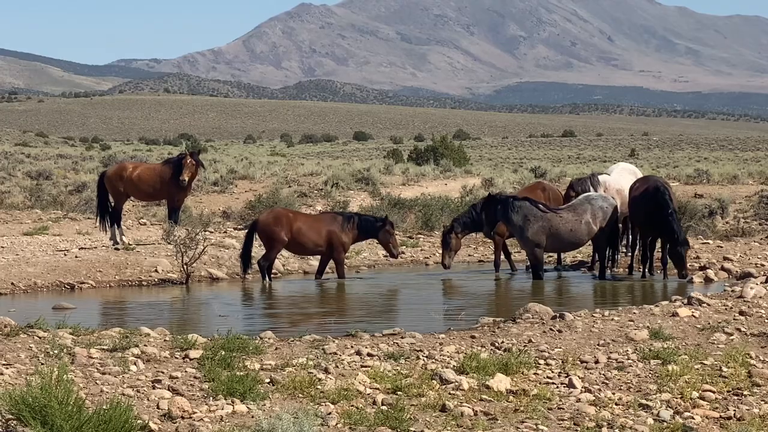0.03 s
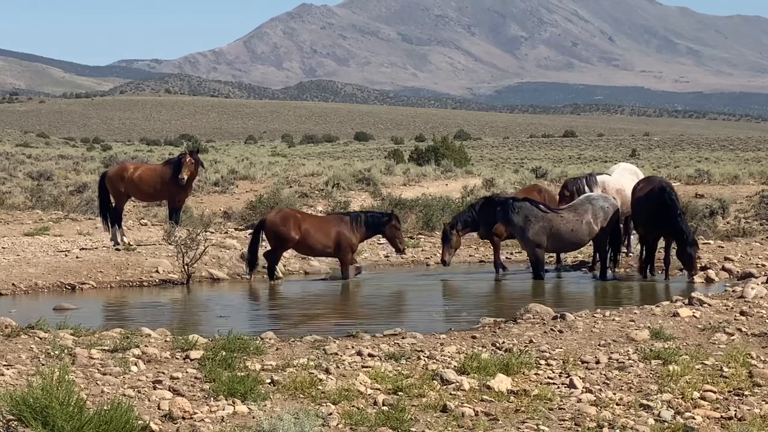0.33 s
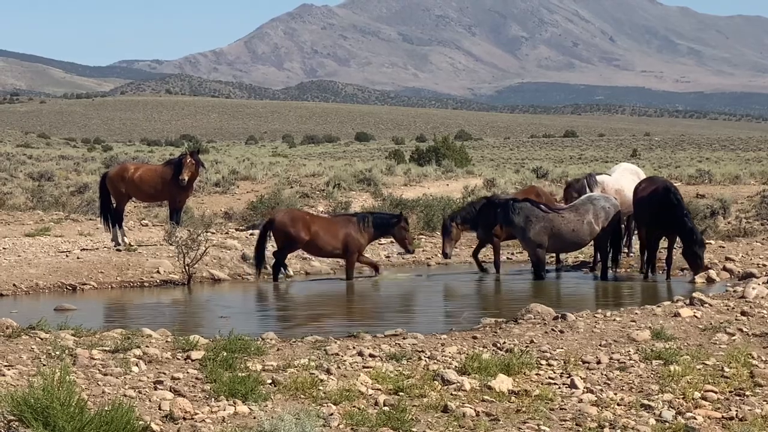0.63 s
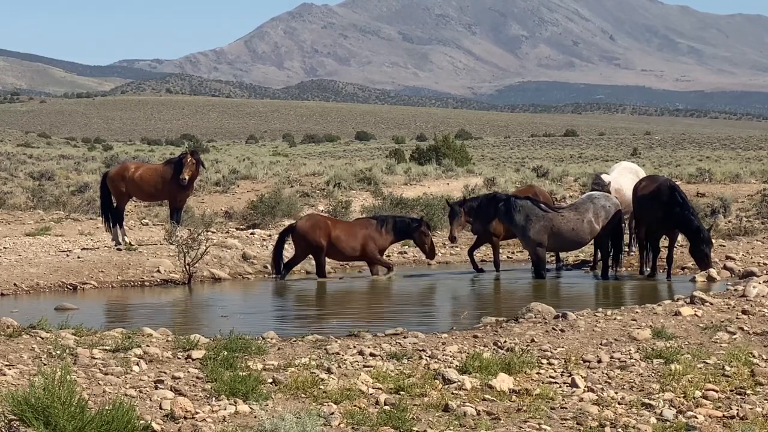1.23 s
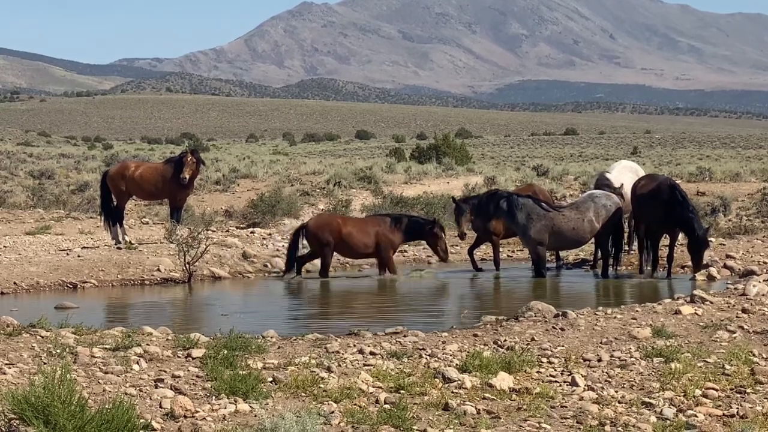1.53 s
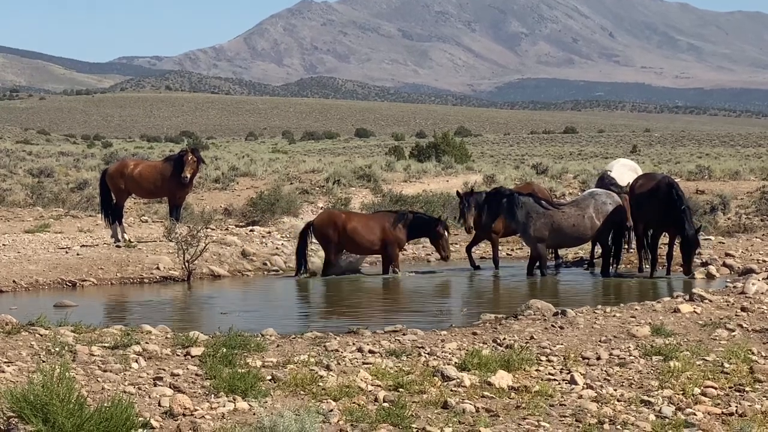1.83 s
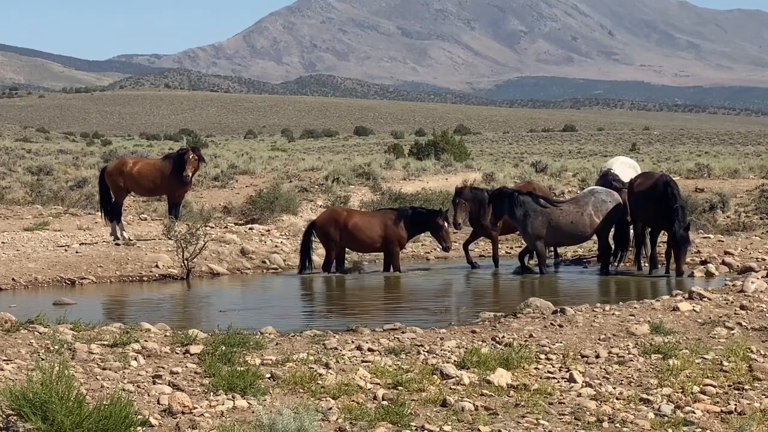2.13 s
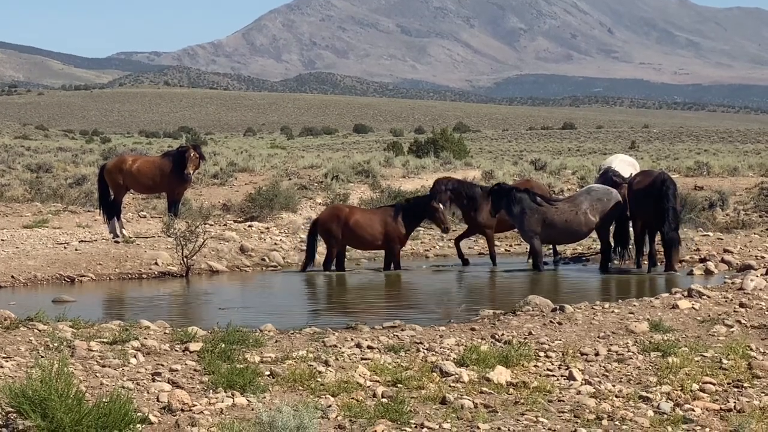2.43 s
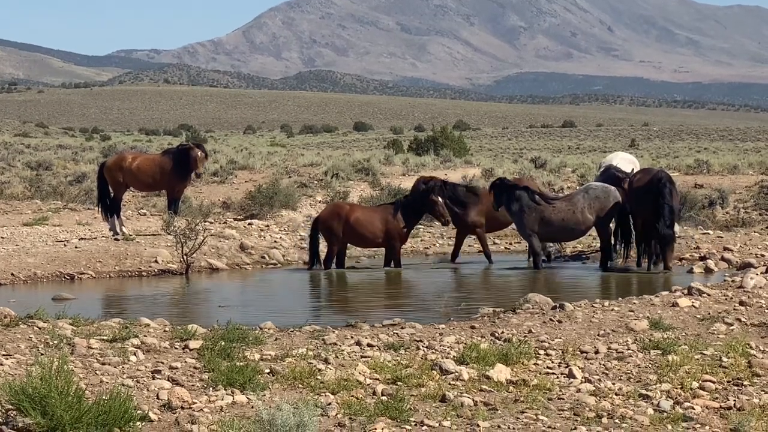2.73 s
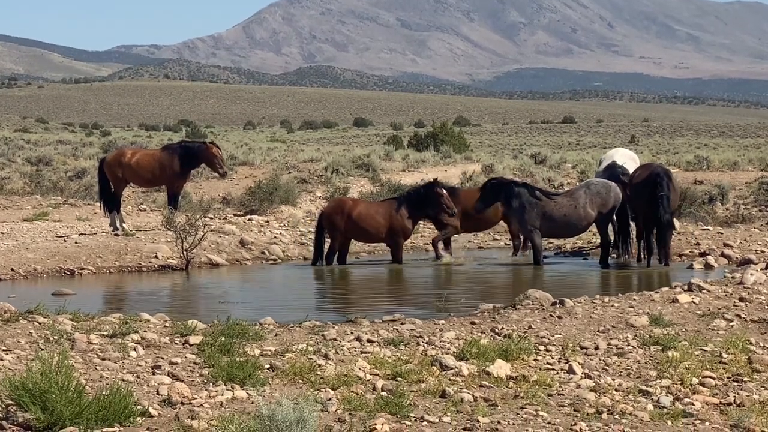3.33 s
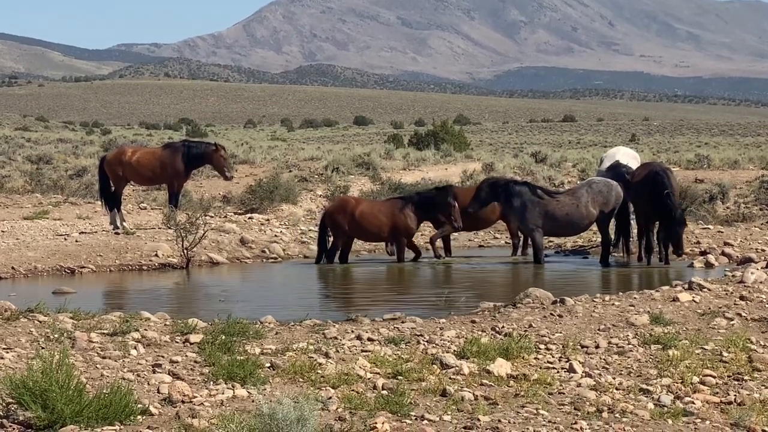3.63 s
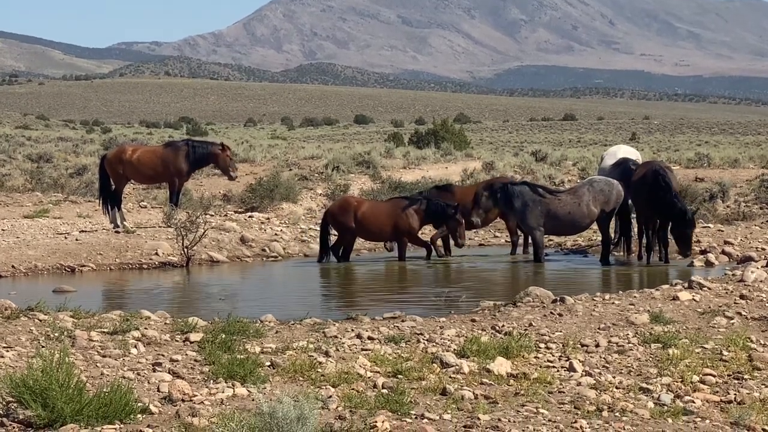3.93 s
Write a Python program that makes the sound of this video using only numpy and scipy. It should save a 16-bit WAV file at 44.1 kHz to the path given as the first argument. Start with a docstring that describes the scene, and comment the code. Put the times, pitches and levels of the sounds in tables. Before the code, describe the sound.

Soft sloshing and splashing comes from horses stepping through a shallow outdoor pond. A gust thumps the microphone first, then hooves plunge, bubbles plink and drops patter, before the low wind rumble swells again at the close.

```python
"""A gust thumps the microphone, then horses are heard wading through a shallow pond some way off.
Their legs churn up ringing bubbles and throw spray that patters back onto the water.
Hooves plunge with hollow gulps and slaps, single bubbles plink, and stony banks add a short echo.
Wind rumbles throughout and buffets hard again near the end, over a faint hiss and a soft, hollow drone."""
import sys
import numpy as np
from scipy import signal
from scipy.fft import rfft, irfft
from scipy.io import wavfile
from scipy.ndimage import uniform_filter1d

SR = 44100
rng = np.random.default_rng(int(sys.argv[2]) if len(sys.argv) > 2 else 0)


def output_pcm(signal):
    """Save a mono or channel-first signal as 16-bit PCM at the path in sys.argv[1].

    Samples are clipped to [-1, 1] before scaling.
    """
    pcm = np.clip(np.atleast_2d(signal).T, -1, 1) * 32767
    wavfile.write(sys.argv[1], SR, np.round(pcm).astype(np.int16))


N = 176400  # 4 seconds


def amp(db):
    """Turns decibels into a number to multiply by."""
    return 10 ** (np.asarray(db) / 20)


def unit(x):
    """Scales a sound to an average strength (rms) of 1."""
    return x / np.sqrt(np.mean(x ** 2) + 1e-20)


def level(curve):
    """Joins (t/s, level/dB) points into a gain for every sample."""
    s, db = np.transpose(curve)
    return amp(np.interp(np.arange(N) / SR, s, db))


def colour(x, spectrum):
    """Shapes the tone with (f/Hz, level/dB) points, then scales to strength 1."""
    hz, db = np.transpose(spectrum)
    f = np.fft.rfftfreq(N, 1 / SR)
    return unit(irfft(rfft(x) * amp(np.interp(np.log(f + 1), np.log(hz), db)), N))


def steadied(x, share):
    """Smooths away a share of the chance swells in a noise."""
    return unit(x / (abs(signal.hilbert(x)) + 0.17) ** share)


def add(mix, s, sound):
    """Mixes a sound in, starting at s seconds."""
    part = mix[max(round(s * SR), 0):][:len(sound)]
    part += sound[:len(part)]


def bubble(hz, cycles, rise=0.047):
    """A fading ring whose pitch rises as the bubble nears the surface."""
    turns = np.arange(int(6 * cycles * SR / hz) + 2) * hz / SR
    age = turns / cycles
    shape = (1 - np.exp(-2 * turns)) * np.exp(-age)
    return shape * np.sin(2 * np.pi * turns * (1 + rise * age / 2))


def swarm(low_hz, high_hz, per_s, cycles, spread_db, sizes):
    """Bubbles of many sizes start ringing at random moments."""
    out = np.zeros(N)
    for hz in np.geomspace(low_hz, high_hz, sizes):
        starts = rng.random(N) < per_s / sizes / SR
        kicks = starts * amp(spread_db * np.minimum(rng.exponential(1, N), 4))
        out += signal.oaconvolve(kicks * rng.choice([-1, 1], N), bubble(hz, cycles) * hz)[:N]
    return unit(out)


def bursts(table, octaves=0.86, attack_s=0.00131, top_hz=4500, spread_db=8):
    """Short rushes of tiny impacts, each rush around its own pitch; distance dulls them."""
    out, size = np.zeros(N), 16384
    t, f = np.arange(size) / SR, np.fft.rfftfreq(size, 1 / SR)
    dull = 1 / np.sqrt(1 + (f / top_hz) ** 10)
    for s, length, db, hz in table:
        impacts = rng.standard_normal(size) * amp(spread_db * np.clip(rng.standard_normal(size), -2, 2))
        band = (1 + (np.log2((f + 1) / hz) / octaves) ** 2 / 2) ** -2.5
        shape = (1 - np.exp(-t / attack_s)) * np.exp(-(t / length) ** 2 / 2)
        rush = shape * irfft(rfft(impacts) * band * dull)
        add(out, s, amp(db) * rush * np.linalg.norm(shape) / np.linalg.norm(rush))
    return out


# Tone of the faint hiss (f/Hz, relative level/dB)
HISS_TONE = [(30, 3.5), (250, -2), (700, -10.5), (1000, -15), (2500, -23.5), (8000, -28.5), (10500, -30),
             (11700, -41.5)]
def background(drone_hz=497.3, width_hz=54.5):
    """Faint hiss, and a narrow band of noise that sounds like a hollow drone."""
    mid, side, drive = rng.standard_normal((3, N))
    f = np.fft.rfftfreq(N, 1 / SR)
    drone = unit(irfft(rfft(drive) / (1 + ((f - drone_hz) / width_hz) ** 2), N))
    hiss = colour(mid, HISS_TONE) + 0.28 * np.array([[1], [-1]]) * colour(side, HISS_TONE)
    return amp(-75.5) * hiss + amp(-71.5) * drone


# Light breeze on the microphone (t/s, level/dB)
BREEZE = [(0, -62), (.45, -68), (.7, -68.5), (.95, -53), (1.6, -60.5), (1.8, -67), (2.1, -67.5),
          (2.4, -60.5), (2.7, -63), (3.4, -59), (3.85, -57.5), (4, -63.5)]
# Separate gusts (peak t/s, half-length/s, level/dB)
GUSTS = [(0.018, 0.03, -34.5), (0.043, 0.0064, -25.5), (0.579, 0.012, -52), (1.006, 0.0047, -43.5),
         (1.099, 0.033, -38.5), (1.178, 0.024, -47.5), (1.249, 0.013, -47), (1.381, 0.0098, -44),
         (1.5, 0.01, -35), (1.544, 0.0068, -40.5), (2.281, 0.025, -51.5), (3.054, 0.013, -41.5),
         (3.127, 0.04, -42), (3.226, 0.014, -44.5), (3.429, 0.015, -38), (3.478, 0.0055, -46),
         (3.541, 0.029, -31), (3.61, 0.014, -33), (3.68, 0.016, -26.5), (3.73, 0.027, -33),
         (3.793, 0.014, -38.5)]
# Starting tone of the rumble, and tone of the brighter buffeting (f/Hz, relative level/dB)
RUMBLE_TONE = [(18, -35), (32, -12), (58, 3.5), (80, -4.5), (120, -15.5), (180, -21.5), (300, -59)]
BUFFET_TONE = [(40, -25), (90, 28.5), (135, -2.5), (190, -12.5), (280, -24.5), (500, -55.5), (1500, -86)]
def eddies(strong_gust_db=-36, growth=1.45):
    """Swirling air pushes on the microphone: a rumble that brightens as the gust gets stronger."""
    t = np.arange(N) / SR
    gust_power = sum((amp(db) * np.exp(-((t - s) / half) ** 2 / 2)) ** 2 for s, half, db in GUSTS)
    fade_in = 1 - np.exp(-(t / 0.002) ** 2)
    force = np.sqrt(level(BREEZE) ** 2 + gust_power) * fade_in
    rumble = steadied(colour(rng.standard_normal(N), RUMBLE_TONE), share=0.75)
    rumble = colour(rumble, [(170, -7), (400, -17.5), (1500, -73.5)])  # keep only the low end
    buffet = colour(rng.standard_normal(N), BUFFET_TONE)
    buffet_gain = amp(strong_gust_db - 7) * (force / amp(strong_gust_db)) ** growth
    return force * rumble + buffet_gain * buffet


def wind(alike=0.9):
    """Nearly the same swirls reach the left and right microphones."""
    return eddies() + np.sqrt((1 - alike) / (1 + alike)) * np.array([[1], [-1]]) * eddies()


def banks(x, fade_60db_s=0.16):
    """The stony banks add a short, dull echo, different at each microphone."""
    t = np.arange(SR // 2) / SR
    echoes = rng.standard_normal((2, len(t))) * (t > .006) * amp(-60 * t / fade_60db_s)
    echoes = signal.lfilter(*signal.butter(1, 1500, fs=SR), echoes / np.linalg.norm(echoes[0]))
    return x + amp(-10) * signal.oaconvolve(x[None], echoes, axes=1)[:, :N]


def clumps(length_s=0.016, depth_db=2.1):
    """Water lands in uneven handfuls, so its loudness flickers quickly."""
    width = int(length_s * SR)
    wobble = uniform_filter1d(uniform_filter1d(rng.standard_normal(N), width), width)
    return unit(amp(depth_db * unit(wobble)))


# Spray falling back on the pond (t/s, level/dB)
SPRAY_LEVEL = [(0, -90), (.22, -94.5), (.31, -82), (.57, -76), (.64, -67), (.71, -69.5), (.82, -66.5),
               (.88, -73.5), (1.11, -78), (1.14, -69.5), (1.35, -68.5), (1.385, -63.5), (1.43, -67),
               (1.5, -65), (1.62, -65), (1.78, -68), (1.95, -67), (2.03, -61.5), (2.28, -62.5), (2.42, -67),
               (2.53, -76), (2.7, -90), (2.8, -69.5), (2.94, -74.5), (3.01, -79), (3.12, -75.5),
               (3.33, -73), (3.56, -71), (3.65, -83.5), (3.73, -77), (3.82, -93), (4, -82.5)]
# Tone of the drops and of the fine mist (f/Hz, relative level/dB)
SPRAY_TONE = [(400, -22.5), (900, -3.5), (1500, -4.5), (2100, -0.5), (2700, -1.5), (3600, -5.5),
              (5000, -13), (7000, -30), (12000, -54)]
MIST_TONE = [(2000, -9), (3700, 5.5), (5800, -4), (7500, -12), (10000, -14), (12000, -43)]
def spray(mist_per_s=2200, mist_growth=2.33):
    """Falling drops ring as tiny bubbles; the hardest splashes add a crackling mist."""
    flicker, gain = clumps(), level(SPRAY_LEVEL)
    drops = swarm(819, 8260, per_s=4200, cycles=3, spread_db=2.5, sizes=30)
    crackle = rng.standard_normal(N) * (rng.random(N) < mist_per_s / SR)
    mist = amp(-67) * (gain / gain.max()) ** mist_growth * colour(crackle, MIST_TONE)
    return flicker * (gain * colour(drops, SPRAY_TONE) + mist)


def stray_bubbles():
    """A few longer-ringing bubbles stand out, swelling and fading with the spray."""
    return amp(-11) * level(SPRAY_LEVEL) * swarm(1200, 3800, per_s=80, cycles=9.5, spread_db=5, sizes=24)


# Single drops landing (t/s, level/dB)
DROP_TICKS = [(1.451, -67), (1.689, -76), (1.923, -64), (2.74, -69), (3.202, -71), (3.675, -72)]
def ticks(length_s=0.0043, hz=4430):
    """A drop strikes the surface with a sharp tick."""
    return bursts([(s, length_s, db, hz) for s, db in DROP_TICKS], top_hz=9400)


# Single large bubbles (t/s, peak level/dB, f/Hz)
BIG_BUBBLES = [(0.253, -61.5, 1550), (.314, -52, 630), (0.4, -53.5, 250), (0.654, -60.5, 498),
               (1.267, -55, 1350), (1.345, -50, 1405), (2.022, -54, 950), (2.538, -62, 340),
               (2.567, -58.5, 1490), (2.64, -62.5, 713), (2.812, -44, 332), (2.899, -50, 306),
               (2.983, -53, 1520), (3.077, -57, 854), (3.104, -48.5, 710), (3.471, -56.5, 593),
               (3.702, -54.5, 3520)]
def plinks(cycles=3.4, shed_within_s=0.018, shed_octaves=0.35):
    """Each large bubble rings and sheds three weaker ones, so that it gurgles."""
    out = np.zeros(N)
    for s, db, hz in BIG_BUBBLES:
        ring = bubble(hz, cycles)
        add(out, s, amp(db) * ring / abs(ring).max())
        for delay, octaves in rng.uniform([0, -1], [1, 2], size=(3, 2)) * [shed_within_s, shed_octaves]:
            add(out, s + delay, amp(db - 8.5) * bubble(hz * 2 ** octaves, cycles))
    return out


# Water stirred by the legs: its loudness (t/s, level/dB) and tone (f/Hz, relative level/dB)
SLOSH_LEVEL = [(0, -91), (.24, -98), (.31, -64), (.45, -71.5), (.58, -81.5), (.71, -72), (.79, -64.5),
               (.9, -67.5), (1.09, -80.5), (1.14, -65), (1.31, -71.5), (1.37, -59), (1.52, -61.5),
               (1.61, -56.5), (1.68, -64), (1.8, -71), (2.03, -64.5), (2.38, -63.5), (2.49, -68),
               (2.56, -77.5), (2.76, -77.5), (2.85, -68), (3.04, -68.5), (3.1, -63.5), (3.2, -66),
               (3.29, -69), (3.37, -65), (3.52, -66.5), (3.68, -75.5), (3.8, -86)]
SLOSH_TONE = [(130, -3.5), (220, -3), (400, -8), (560, 1), (700, 5), (1000, -1), (1500, -5.5), (2500, -15),
              (6000, -72)]
def slosh():
    """The legs push up surges of bubbles that ring together."""
    churn = swarm(191, 2200, per_s=1700, cycles=4.83, spread_db=3.5, sizes=36)
    return level(SLOSH_LEVEL) * colour(churn, SLOSH_TONE)


# Low gulps and bright slaps of the hooves (t/s, length/s, level/dB, centre f/Hz)
HOOF_GULPS = [(.305, 0.01, -66, 680), (.365, 0.0093, -57, 330), (.73, 0.075, -58, 214),
              (1.54, 0.078, -58.5, 217), (1.98, 0.066, -64.5, 297), (2.365, 0.026, -57.5, 330),
              (2.794, 0.012, -51.5, 285), (2.807, 0.016, -49, 650), (2.835, 0.064, -60.5, 340),
              (2.895, 0.025, -48.5, 282), (2.922, 0.023, -51, 643), (3.245, 0.058, -57.5, 647)]
HOOF_SLAPS = [(.165, 0.014, -75, 2720), (.795, 0.036, -67, 3340), (1.122, 0.033, -70.5, 1070),
              (1.373, 0.024, -60.5, 2970), (1.585, 0.02, -62.5, 2020), (1.827, 0.018, -60, 1690),
              (2.025, 0.03, -60, 3660), (2.286, 0.016, -58.5, 2070), (2.792, 0.0084, -54.5, 1680),
              (2.9, 0.053, -63, 1690), (2.927, 0.025, -63.5, 2030), (3.02, 0.02, -70, 2500),
              (3.098, 0.018, -63, 1610), (3.68, 0.02, -71, 3090), (3.701, 0.0076, -56, 2560)]
def hooves():
    """Hooves slap the water, and the hollows behind them collapse with a gulp."""
    gulps = bursts(HOOF_GULPS, octaves=0.6, attack_s=0.0025, spread_db=10.5)
    return gulps + bursts(HOOF_SLAPS)


def scene():
    """Horses straight ahead between the banks, wind right at the microphones."""
    wading = spray() + slosh() + stray_bubbles() + hooves() + ticks() + plinks()
    return banks(wading) + wind() + background()


def camera_body(x, resonances):
    """The camera body makes some pitches louder and others softer at one microphone."""
    for hz, width, db in resonances:
        angle, gain = 2 * np.pi * hz / SR, amp(db / 2)
        spread, centre = np.sin(angle) * width / hz / 2, -2 * np.cos(angle)
        x = signal.lfilter([1 + spread * gain, centre, 1 - spread * gain],
                           [1 + spread / gain, centre, 1 - spread / gain], x)
    return x


# Peaks and dips from the camera body at each microphone (f/Hz, width/Hz, level change/dB)
LEFT_RESONANCES = [(258, 180, 2.5), (800, 220, -3), (1472, 99, -9.5), (1937, 250, 4)]
RIGHT_RESONANCES = [(830, 980, 0.5), (1233, 122, -19.5), (1493, 810, 11), (1755, 113, -18.5),
                    (2010, 220, 2.5), (2425, 200, -9)]
def record(dry, lag_hz=8560, lag_width_hz=770, top_hz=15800):
    """Each microphone has its own tone, the left lags around one pitch, and the top treble is cut."""
    b, a = signal.iirnotch(lag_hz, lag_hz / lag_width_hz, SR)
    left = signal.lfilter(2 * b - a, a, camera_body(dry[0], LEFT_RESONANCES))  # 2b - a only delays
    right = camera_body(dry[1], RIGHT_RESONANCES)
    treble_cut = signal.firwin(511, top_hz, window=("kaiser", 9), fs=SR)
    return signal.oaconvolve(np.array([left, right]), treble_cut[None], "same")


dry = scene()
out = record(dry)
output_pcm(out)
```